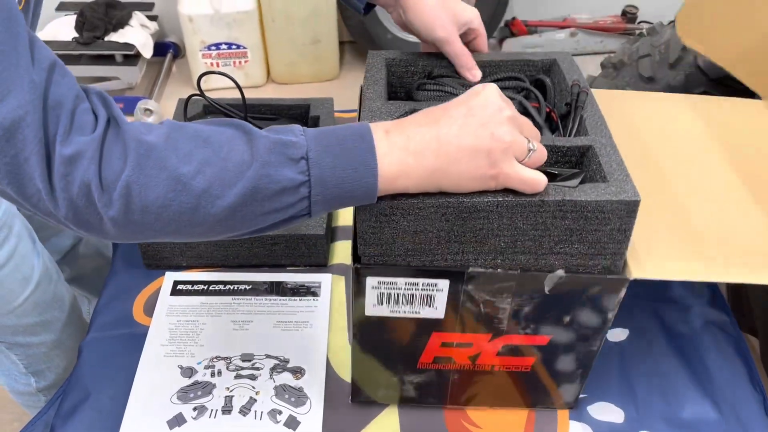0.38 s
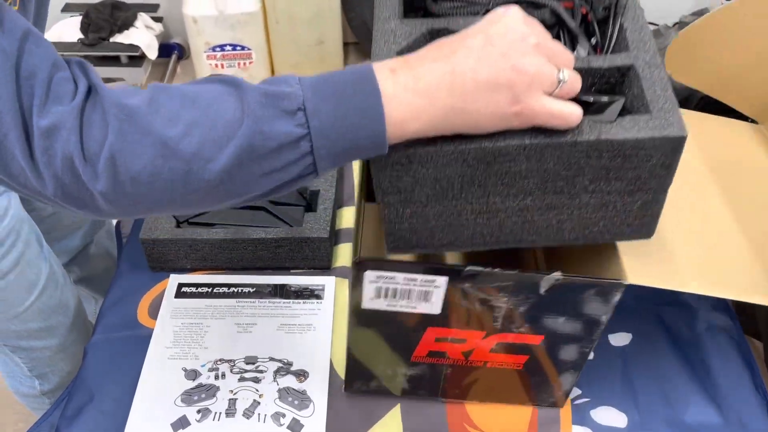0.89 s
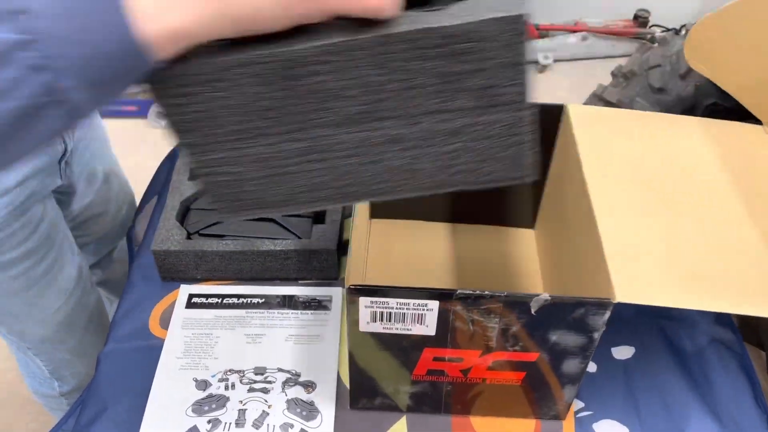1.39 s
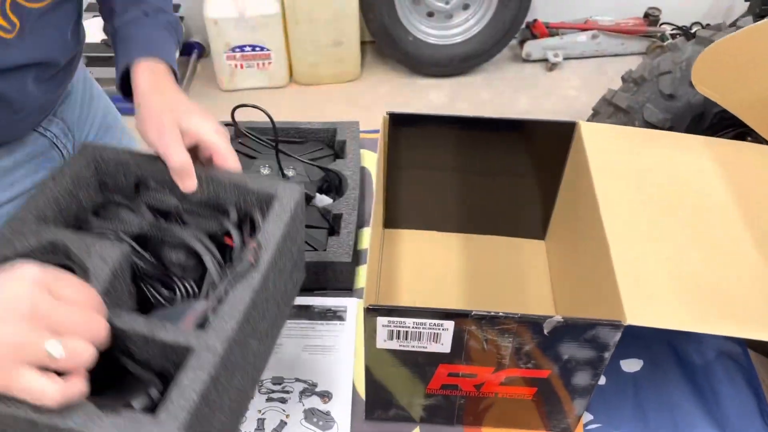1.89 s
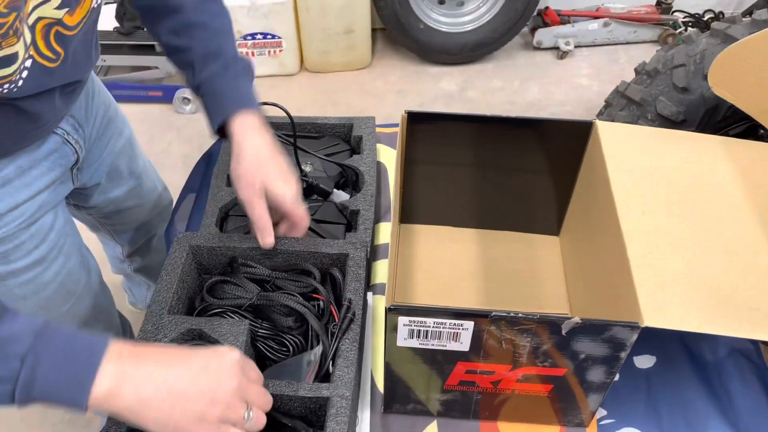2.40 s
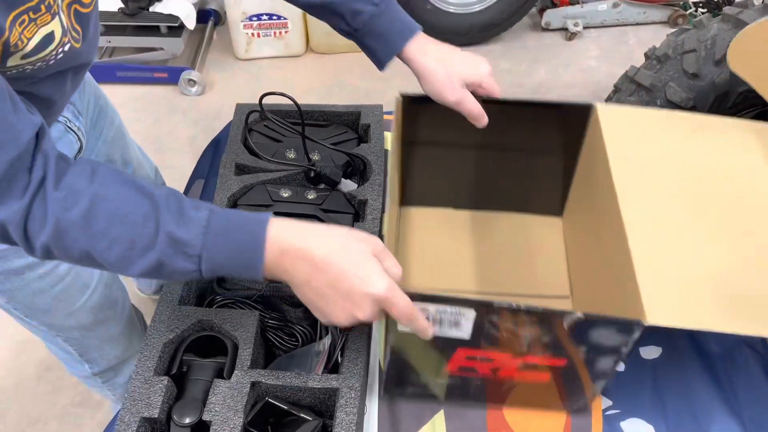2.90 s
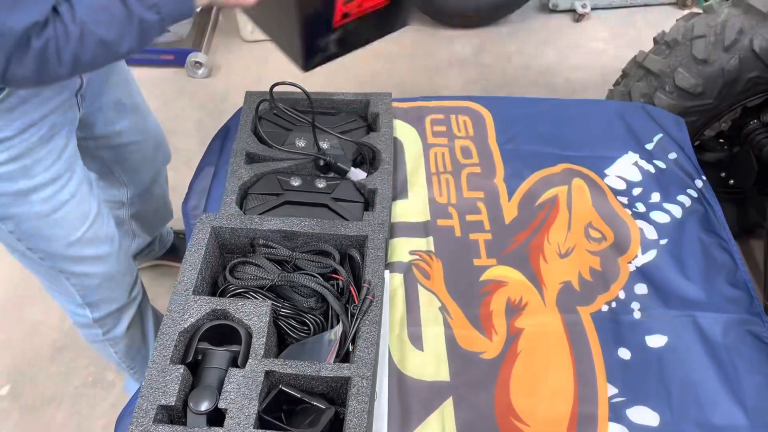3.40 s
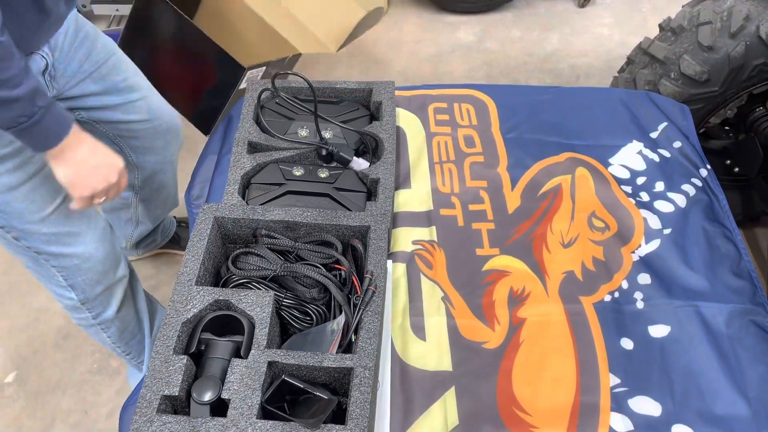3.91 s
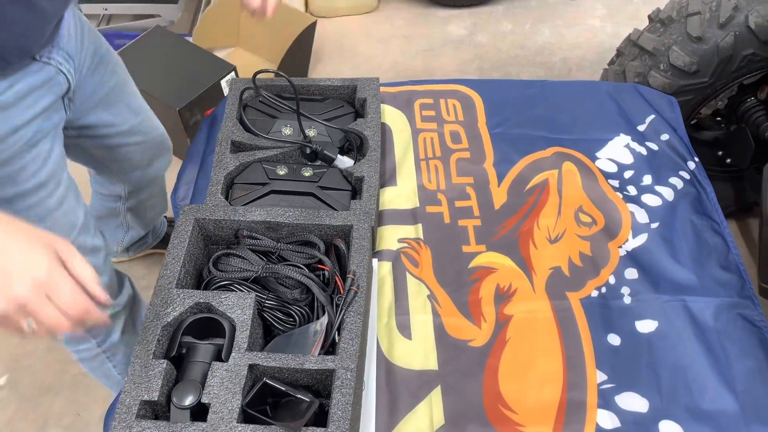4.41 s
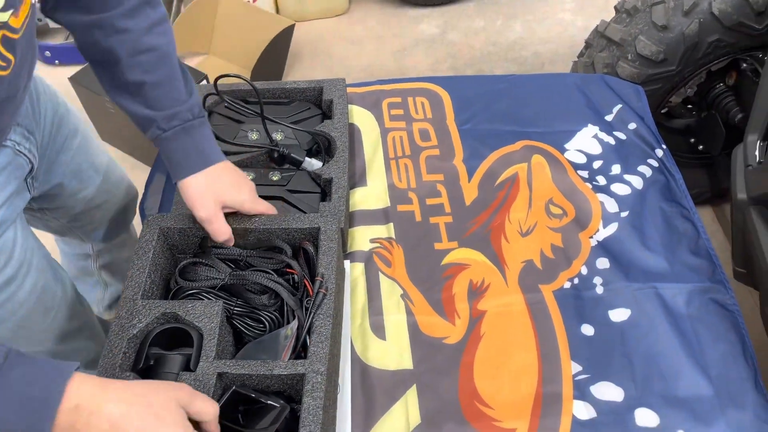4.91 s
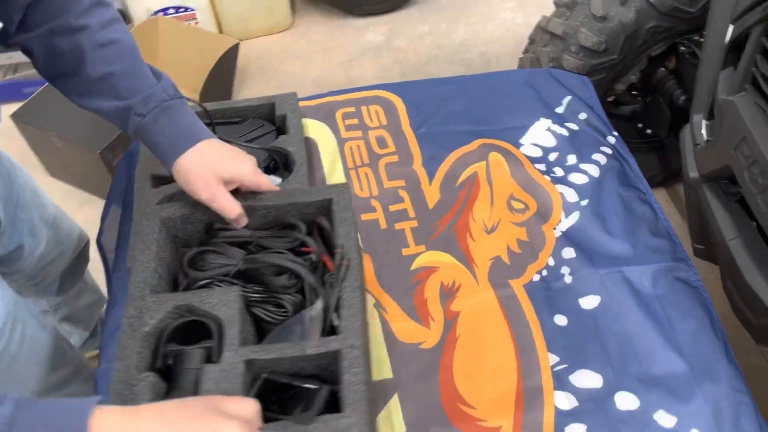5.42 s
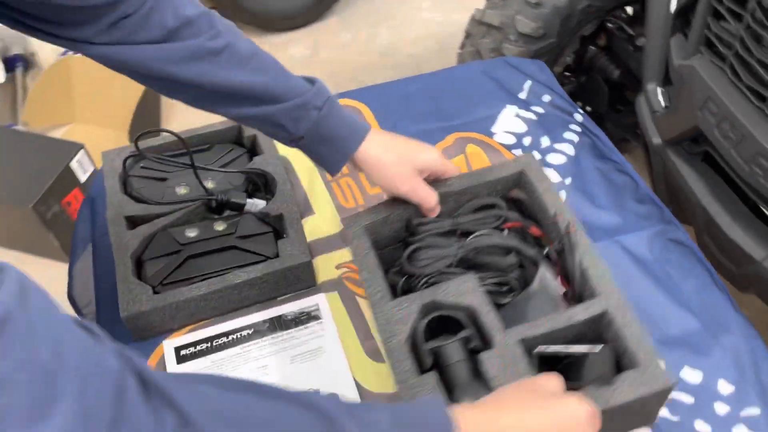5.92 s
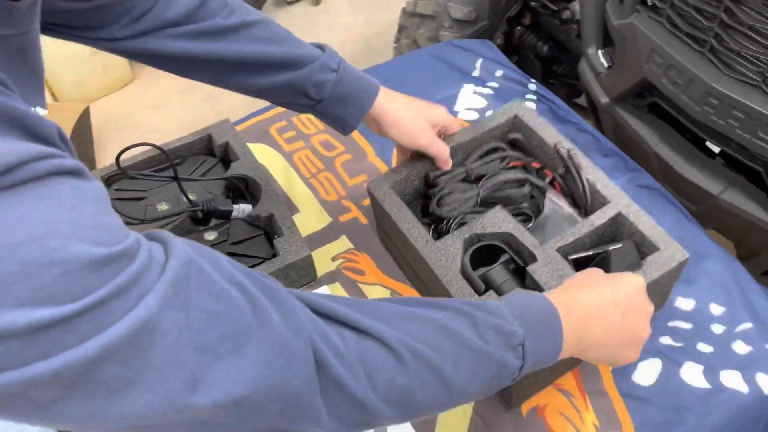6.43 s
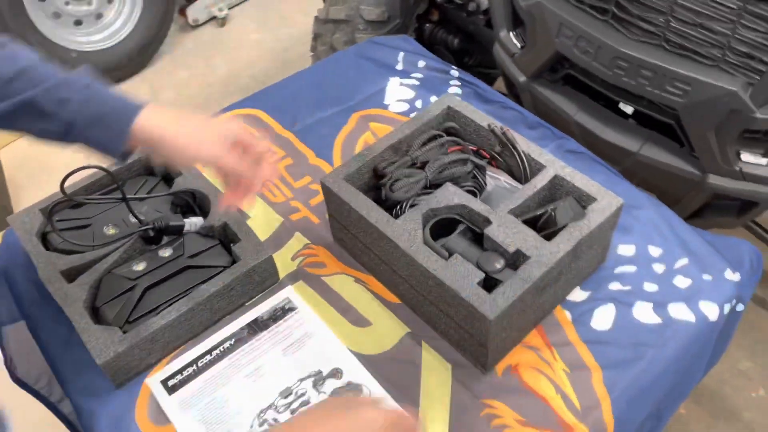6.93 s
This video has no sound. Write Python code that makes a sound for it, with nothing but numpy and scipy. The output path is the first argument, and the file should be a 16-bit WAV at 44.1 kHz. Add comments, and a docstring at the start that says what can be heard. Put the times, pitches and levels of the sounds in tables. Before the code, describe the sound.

Foam trays scrape and boom out of a cardboard box with knocks and ticks, then the empty box drops on concrete and skids in a garage.

```python
"""Foam rubs along card at once, close by, as trays with cable bundles leave a cardboard box in a hard garage.
Knocks, ticks and flaps follow; the empty box drops on the concrete and skids, then a tray slides over a table cloth.
Rubbing and sliding are random slips, filtered; blows are decaying modes and noise bursts.
Filtered noise makes the low distant hum and the room's echo; the microphone has two ports."""
import sys
import numpy as np
from scipy import signal
from scipy.fft import rfft, irfft
from scipy.io import wavfile
from scipy.ndimage import uniform_filter1d

SR = 44100
rng = np.random.default_rng(int(sys.argv[2]) if len(sys.argv) > 2 else 0)


def digitize_waveform(pressure):
    """Quantize a signal to 16-bit integers and store it at the path in sys.argv[1].

    Rows of a 2-D input are taken as channels; values are limited to [-1, 1].
    """
    field = np.atleast_2d(pressure).T
    bounded = np.clip(field, -1, 1)
    quanta = np.round(bounded * 32767).astype(np.int16)
    wavfile.write(sys.argv[1], SR, quanta)


def ratio(d):
    """dB to gain"""
    e = np.asarray(d, float) / 20
    return 10 ** e


N = 311326  # samples

# Distant machinery and air. Each row: frequency in Hz, relative level in dB per Hz.
HUM_SPECTRUM = [(20, -60), (40, -5.5), (80, 1.5), (130, -10), (260, -10.5), (500, -18), (1200, -25),
                (2200, -33.5), (3500, -41.5), (7000, -49.5), (13000, -40), (16000, -43.5)]
HUM_DB = -57.5
# Decay of the garage. Each row: frequency in Hz, time to fall 60 dB in s.
ROOM_DECAY = [(60, 0.33), (250, 0.94), (700, 1), (1500, 1), (4000, 0.71), (12000, 0.85)]
ROOM_DB = -9.5
# Width of diffuse sound at the ports. Each row: frequency in Hz, side minus mid in dB.
DIFFUSE_SIDE = [(60, -15.5), (200, -13.5), (400, -4), (800, -2.5), (5000, -2)]
# Phase of the right port's shared treble against the left. Each row: frequency in Hz, turn in radians.
PORT_TURN = [(6000, 0.69), (7600, 2.6), (8400, 2.7), (9300, 3.62), (10500, 4.27), (12500, 5.8), (16000, 19)]
SHARED_HZ = 6670  # above this both ports carry one signal
LOW_HZ, TOP_HZ = 45, 15350  # limits of the microphone

# Bands of scraped card. Each row: centre in Hz, width in Hz, relative level in dB.
SCRAPE_BANDS = [(655, 940, 2), (1021, 360, -9.5), (1330, 50, 1.5), (1870, 154, -5.5)]
# Crackle of foam and card. Each row: frequency in Hz, relative level in dB per Hz.
CRACKLE_SPECTRUM = [(1200, -3), (2200, 0), (3200, 0), (5000, -3), (7000, -9.5), (10000, -19)]
# Finest, brightest friction. Each row: frequency in Hz, relative level in dB per Hz.
FIZZ_SPECTRUM = [(4000, -64), (7000, 3.5), (10000, 3.5), (13500, -2), (16000, -1.5)]
# Panels and air of the box. Each row: nominal frequency in Hz, relative level in dB, nominal 60 dB decay in s.
BOX_MODES = [(56, -14, .15), (103, -7, .16), (138, -2, .25), (233, -5, .09), (265, -5, .09), (323, -6, .11),
             (352, -8, .18), (468, -7, .07), (550, -7, .07), (587, -5, .075), (609, -6, .075),
             (775, -2, .055), (950, -5, .04), (1500, -11, .035)]

# Thin squeaks on the cloth, lower as they catch and let go.
# Each row: start in seconds, length in s, top pitch in Hz, sag in Hz, level in dB.
CLOTH_SQUEAKS = [(5.695, .24, 5390, 950, -82), (6.085, .09, 4790, 350, -82)]
CATCH_S, LET_GO_S = .05, .075
# the tray's hollow rasp on the cloth
SLIDE_S, SLIDE_HOLD_S, SLIDE_SWELL_S, SLIDE_DB = 5.63, .46, .05, -78.5
SLIDE_HZ, SLIDE_WIDTH_HZ = 2010., 130.
# the fallen box on the concrete
SKID_S, SKID_SWELL_S, SKID_DB, SKID_FADE_DB_S = 4.72, 0.11, -51.5, 67
SKID_FROM_HZ, SKID_TO_HZ, SKID_WIDTH_HZ = 950., 1234, 360

# Small plastic parts tapping together; the row at 3.969 s is a brief high ring in the flap's swish. Each row:
# time in seconds, nominal pitch in Hz, level in dB.
PLASTIC_PIPS = [(1.56, 2170, -47), (2.392, 1860, -31), (3.969, 4560, -35), (5.167, 1174, -36.5),
                (5.469, 1750, -49), (6.755, 1050, -42), (6.853, 2020, -48.5), (7.005, 1030, -45)]
# Partials of a pip. Each row: ratio to its pitch, relative level in dB.
PIP_RATIOS = [(.78, -2.5), (1, 3.5), (1.2, -6.5)]
PIP_T60_S = .014
# Dry ticks of cable ties and foam cells. Each row: time in seconds, level in dB.
DRY_TICKS = [(0.941, -56), (0.9718, -50.5), (1.229, -60.5), (1.258, -55.5), (1.276, -51.5), (1.2989, -50),
             (1.616, -55), (2.842, -44.5), (2.9365, -58.5), (2.957, -63), (3.152, -43), (3.169, -49.5),
             (3.97, -46.5)]
# Knocks of trays, cables and hands.
# Each row: time in seconds, blow in dB, thud pitch in Hz, thud in dB above the blow, crack in dB above the blow.
TRAY_KNOCKS = [(0.145, -23.5, 303, -20, -29), (0.18, -42, 172, 15.5, -29), (0.666, -43.5, 296, 18, -21),
               (0.704, -41.5, 341, 6, 3.5), (0.929, -49, 232, -21, -7), (1.093, -34.5, 175, -1, -52),
               (1.131, -39.5, 233, 3.5, -42), (1.18, -42.5, 175, 3.5, -51), (1.219, -38, 178, 2.5, -42),
               (2.195, -32.5, 397, -12, -13), (2.503, -48, 280, -26, -12), (2.765, -32, 173, 12, -9.5),
               (2.857, -41, 115, 7.5, -12.5), (3.045, -49, 233, -22.5, -14), (3.151, -49.5, 103, 1.5, -3),
               (3.603, -46.5, 380, -5.5, -15.5), (4.67, -51, 326, 7, -18), (4.692, -51.5, 320, 11, -28),
               (4.728, -56, 422, 17.5, -30), (5.47, -55.5, 700, -6, -36), (6.441, -51, 71.6, 14, -27),
               (6.471, -38.5, 95, 5, -23), (6.488, -46, 130.4, 7, -28.5), (6.612, -47, 169, -3, -5.5)]

# Card flaps whipping past cloth.
# Each row: start in seconds, crackle in dB, fade in dB per s, fizz and scrape in dB above the crackle.
FLAP_SWISHES = [(3.232, -45, 111, -7, -12), (3.962, -57.5, 139, 7.5, -9)]
SWISH_RISE_S, SWISH_HOLD_S, FIZZ_FADES_FASTER = 0.008, 0.03, 4.3
WHOOSH_FROM_HZ, WHOOSH_TO_HZ, WHOOSH_WIDTH_HZ = 3300., 2100., 900.
WHOOSH_FALL_S, WHOOSH_DB = .04, -9  # level against the crackle
# Foam jammed along the card walls, dull and boomy.
# Each row: start in seconds, hold in s, scrape in dB, boom in dB above the scrape.
FOAM_PULLS = [(0, 0.0065, -44.5, 8), (0.05, 0.14, -62, 7), (0.151, 0.069, -43, 6.5), (0.247, 0.093, -50, 6),
              (0.653, 0.025, -57, 18), (0.75, 0.029, -53, 10), (1.097, 0.16, -70, 20.5),
              (2.764, 0.011, -49, 12.5), (6.46, 0.019, -45.5, 2)]
PULL_RISE_S, PULL_FADE_DB_S, PULL_CRACKLE_DB, PULL_FIZZ_DB = 0.0014, 207, -11.5, -19
# Hands, foam and cables brushing card or cloth.
# Each row: start in seconds, swell in s, scrape in dB, fade in dB per s, extra treble in dB.
BRUSHING_RUBS = [(.03, 0.059, -57, 60, 9.5), (0.151, 0.0082, -46, 210, 7), (.33, 0.078, -55.5, 39, 4.5),
                 (.44, 0.065, -47, 305, 2.5), (.52, 0.024, -46, 198, 3.5), (.6, 0.038, -53.5, 86, 10.5),
                 (0.694, 0.011, -50.5, 403, 13), (1.55, 0.1, -66, 95.5, 4), (2.08, 0.049, -60.5, 104, -0.5),
                 (2.176, 0.015, -51.5, 200, 0.5), (2.21, 0.02, -55, 150, -2), (2.327, 0.021, -52, 83, 8),
                 (2.375, 0.024, -52, 204, 8), (2.685, .008, -63, 53.5, 1), (2.78, 0.014, -64, 202, 13.5),
                 (3.09, 0.029, -54.5, 199, 0), (4.662, 0.0075, -47, 49.5, 8), (4.761, 0.093, -51.5, 58, 4),
                 (5.07, 0.085, -59.5, 160, 7), (5.551, 0.1, -77.5, 11, 10.5), (6.02, 0.028, -67, 204, 12),
                 (6.38, 0.041, -59, 68, -1.5), (6.42, 0.036, -43, 300, 5.5), (6.53, 0.071, -58, 217, 10.5),
                 (6.92, 0.066, -60, 85, 0)]
RUB_CRACKLE_DB, RUB_FIZZ_DB, RUB_BOOM_DB = -9.5, -9, -7  # above the scrape; treble is added to the first two
# The empty box lands on corner, edge and face, then bounces.
# Each row: time in seconds, blow in dB, slap in dB above the blow, brightness in dB per octave.
BOX_LANDINGS = [(4.127, -8.5, -27, 2.5), (4.141, -13.5, -45, -0.5), (4.165, -7, -30.5, 0.5),
                (4.181, -6.5, -50, -0.5), (4.195, -18.5, -36, 0), (4.225, -12, -50.5, -0.5),
                (4.26, -15, -49, -1.5), (4.305, -18, -44, -1), (4.344, -19.5, -23.5, 1)]


def unit(x):
    """Scaled to rms 1."""
    return x / np.sqrt(np.mean(x ** 2))


def read(table, hz):
    """A (Hz, value) table joined by straight lines on a log frequency axis."""
    f, v = np.transpose(table)
    return np.interp(np.log(np.maximum(hz, 1)), np.log(f), v)


def colour(x, gain):
    """Filter by a gain given as a function of frequency."""
    hz = np.arange(x.shape[-1] // 2 + 1) * SR / x.shape[-1]
    return irfft(rfft(x) * gain(hz), x.shape[-1])


def shaped(x, table):
    """Coloured by a (Hz, dB) table, rms 1."""
    return unit(colour(x, lambda hz: ratio(read(table, hz))))


def band(x, lo_hz, hi_hz):
    """Causal band-pass."""
    return signal.sosfilt(signal.butter(2, [lo_hz, min(hi_hz, .45 * SR)], "band", fs=SR, output="sos"), x)


def ring(hz, t60, s):
    """One decaying mode."""
    return np.sin(2 * np.pi * hz * s) * np.exp(-np.log(1000) * s / t60)


def add(out, t, sound):
    """Mix a sound in at time t."""
    i = int(t * SR)
    out[i:i + len(sound)] += sound[:N - i]


def walk(rate):
    """Random levels, one every 1 / rate s, smoothed twice; spread near 1."""
    k = int(SR / rate)
    steps = np.repeat(rng.standard_normal(N // k + 1), k)
    return 1.73 * uniform_filter1d(uniform_filter1d(steps, k), k)[:N]


def slips(rate, spread_db):
    """Tiny slips of foam cells, rate per second on average, a few much larger than the rest."""
    chance = rng.random((3, N))
    happens = chance[0] < rate / SR
    size = ratio(-spread_db * np.log(1 - chance[2]))
    return unit(happens * np.sign(chance[1] - .5) * size)


def stroke(start, swell, hold, db, fade_db_s):
    """Power of one movement: it swells, holds, then fades at a steady rate."""
    s = np.arange(N) / SR - start
    rise = np.clip(s / max(swell, 1 / SR), 0, 1)
    return (rise * ratio(db - fade_db_s * np.maximum(s - swell - hold, 0))) ** 2


def rasp(x, hz, width_hz):
    """Slips heard through one band whose centre may move from sample to sample; rms 1."""
    slow = signal.sosfilt(signal.butter(2, width_hz / 2, fs=SR, output="sos"), x)
    return unit(slow * np.sin(2 * np.pi * np.cumsum(hz) / SR))


def snap(noise, fizz=0.7):
    """The bright colour of a breaking contact."""
    return shaped(noise, CRACKLE_SPECTRUM) + fizz * shaped(noise, FIZZ_SPECTRUM)


def wide(mid, side):
    """Diffuse sound: alike at both ports in the bass, less related higher up."""
    side = colour(side, lambda hz: ratio(read(DIFFUSE_SIDE, hz)))
    return np.array([mid + side, mid - side])


def hum():
    """Distant machinery and air: coloured noise, wavering a little."""
    mid, side = colour(rng.standard_normal((2, N)), lambda hz: ratio(read(HUM_SPECTRUM, hz)))
    return ratio(HUM_DB + 0.38 * walk(3.84)) * wide(mid, side) / np.std(mid)


def garage(x):
    """Reflections build up over some ms and die away band by band."""
    s, tail = np.arange(int(1.2 * SR)) / SR, 0
    for hz in 40 * 2. ** np.arange(0, 8.7, 1 / 3):  # third octaves
        t60 = read(ROOM_DECAY, hz)
        noise = band(rng.standard_normal((2, len(s))), hz / 2 ** (1 / 6), hz * 2 ** (1 / 6))
        tail = tail + noise * np.exp(-np.log(1000) * s / t60) / np.sqrt(t60)
    tail = tail * (1 - np.exp(-s / 0.013))
    tail = wide(*tail) / np.sqrt(np.sum(tail[0] ** 2))
    return ratio(ROOM_DB) * signal.fftconvolve(x[None], tail, axes=1)[:, :N]


def table_top(x):
    """Near sounds arrive slightly from the left; table and trays scatter them differently to each port."""
    s = np.arange(SR // 20) / SR
    scatter = rfft(rng.standard_normal(len(s)) * np.exp(-s / 0.011), N)
    side = irfft(rfft(x) * scatter / np.abs(scatter), N)  # phase only
    return wide(x, side) * ratio([[.6], [-.6]])


def sliding():
    """Foam dragged over cloth: a narrow rasp and a wavering stick-slip tone."""
    t = np.arange(N) / SR
    hollow = rasp(slips(900., 1.5), SLIDE_HZ * (1 + .014 * walk(14)), SLIDE_WIDTH_HZ)
    drag = np.sqrt(stroke(SLIDE_S, SLIDE_SWELL_S, SLIDE_HOLD_S, SLIDE_DB, 200.))
    out = drag * ratio(1.8 * walk(20)) * hollow
    for start, length, top_hz, sag_hz, db in CLOTH_SQUEAKS:
        since, left = t - start, start + length - t
        edge = np.clip(np.minimum(since, left), 0, 1)
        slack = np.maximum(1 - since / CATCH_S, 1 - left / LET_GO_S)
        hz = top_hz - sag_hz * np.clip(slack, 0, 1) ** 2
        tone = np.sin(2 * np.pi * np.cumsum(hz * (1 + 0.002 * walk(110))) / SR)
        out = out + np.minimum(edge / 0.017, 1) * ratio(db + 2.0 * walk(60)) * np.sqrt(2) * tone
    return out


def skid():
    """Card drags over concrete in uneven slips; the band it rasps in climbs with the push."""
    push = np.clip((np.arange(N) / SR - SKID_S) / SKID_SWELL_S, 0, 1)
    hz = (SKID_FROM_HZ + (SKID_TO_HZ - SKID_FROM_HZ) * push) * (1 + .05 * walk(25))
    drag = np.sqrt(stroke(SKID_S, SKID_SWELL_S, 0, SKID_DB, SKID_FADE_DB_S))
    return drag * rasp(slips(1200., 2.4), hz, SKID_WIDTH_HZ)


def plastic_pips():
    """Small plastic parts tap together, and one flap rings briefly: a few short partials, roughened by noise."""
    out, s = np.zeros(N), np.arange(SR // 5) / SR
    for t, hz, db in PLASTIC_PIPS:
        tone = sum(ratio(g) * ring(r * hz, PIP_T60_S, s) for r, g in PIP_RATIOS)
        rough = 1 + 0.26 * rng.standard_normal(len(s))
        add(out, t, ratio(db) * tone * (1 - np.exp(-s / 0.002)) * rough)
    return out


def ticks():
    """Cable ties and foam cells tick dryly: all crack, gone within some ms."""
    out, s = np.zeros(N), np.arange(SR // 5) / SR
    for t, db in DRY_TICKS:
        add(out, t, ratio(db) * snap(rng.standard_normal(len(s)), 1.95) * np.exp(-s / 0.0012))
    return out


def knocks():
    """Each knock: a dull tap, a short low thud of the struck tray and a crack of noise."""
    out, s = np.zeros(N), np.arange(SR // 5) / SR
    for t, db, hz, thud_db, crack_db in TRAY_KNOCKS:
        noise = rng.standard_normal((2, len(s)))
        tap = band(noise[0] * np.exp(-s / 0.012), 600.0, 1480.0) * 2.0 + ring(620., 0.0085, s)
        thud = 2.05 * ring(hz, 0.052, s) * (1 - np.exp(-(s / 0.0037) ** 2))  # soft foam pushes slowly
        crack = snap(noise[1]) * np.exp(-s / 0.0093)
        add(out, t, ratio(db) * (tap + ratio(thud_db) * thud + ratio(crack_db) * crack))
    return out


def swishes(scrape, crackle, fizz, air):
    """A flap whips past without grip: a quick front, a smooth fade, a band that sinks as it slows."""
    out, t = 0, np.arange(N) / SR
    for start, db, fade, fizz_db, scrape_db in FLAP_SWISHES:
        fall = np.exp(-np.maximum(t - start, 0) / WHOOSH_FALL_S)
        hz = WHOOSH_TO_HZ + (WHOOSH_FROM_HZ - WHOOSH_TO_HZ) * fall
        whoosh = ratio(WHOOSH_DB) * rasp(air, hz, WHOOSH_WIDTH_HZ)
        body = crackle + ratio(scrape_db) * scrape + whoosh
        out = out + np.sqrt(stroke(start, SWISH_RISE_S, SWISH_HOLD_S, db, fade)) * body
        fizz_power = stroke(start, SWISH_RISE_S, SWISH_HOLD_S, db + fizz_db, FIZZ_FADES_FASTER * fade)
        out = out + np.sqrt(fizz_power) * fizz
    return out


def pressure():
    """How hard the movements drive scrape, crackle, fizz and boom at each moment."""
    mix_db = [[0, PULL_CRACKLE_DB, PULL_FIZZ_DB, boom_db] for *_, boom_db in FOAM_PULLS]
    mix_db += [[0, RUB_CRACKLE_DB + treble_db, RUB_FIZZ_DB + treble_db, RUB_BOOM_DB]
               for *_, treble_db in BRUSHING_RUBS]
    moves = [stroke(t, PULL_RISE_S, hold, db, PULL_FADE_DB_S) for t, hold, db, _ in FOAM_PULLS]
    moves += [stroke(t, swell, 0, db, fade) for t, swell, db, fade, _ in BRUSHING_RUBS]
    return np.sqrt(ratio(mix_db).T ** 2 @ np.array(moves))  # powers add


def rubbing():
    """Slips ring the card walls, crackle in the foam and shake the hollow box; the grip is never even."""
    coarse, fine, shake = slips(1800., 2.2), slips(5000., 2.3), slips(900., 1.5)
    finest = fine + .8 * slips(1500., 3.3)
    scrape = band(coarse, 464.0, 1600.0)
    scrape = scrape + sum(ratio(db) * band(coarse, f - w / 2, f + w / 2) for f, w, db in SCRAPE_BANDS)
    s = np.arange(SR // 4) / SR
    panels = sum(ratio(g) * ring(f, .5 * t60, s) for f, g, t60 in BOX_MODES[1:7])  # damped by the foam's hold
    boom = unit(band(shake, 53.0, 347.0)) + 0.088 * unit(signal.fftconvolve(shake, panels)[:N])
    crackle, fizz = shaped(fine, CRACKLE_SPECTRUM), shaped(finest, FIZZ_SPECTRUM)
    layers = np.array([unit(scrape), crackle, fizz, unit(boom)])
    grip = ratio(2.3 * walk(45))
    return grip * np.sum(pressure() * layers, axis=0) + swishes(*layers[:3], fine)


def box_drop():
    """Each contact with the floor shakes the box modes anew, with a papery thump and a slap."""
    out, s = np.zeros(N), np.arange(SR // 2) / SR
    for t, db, slap_db, tilt_db in BOX_LANDINGS:
        share, noise = rng.standard_normal(len(BOX_MODES)), rng.standard_normal((2, len(s)))
        modes = 0
        for c, (f, g, t60) in zip(share, BOX_MODES):  # c varies sign, level and pitch
            level_db = g + 2.0 * c + tilt_db * np.log2(f / BOX_MODES[6][0])
            modes = modes + np.sign(c) * ratio(level_db) * ring(f * (1 + 0.0098 * c), t60, s)
        thump = band(noise[0], 184.0, 810.0) * np.exp(-s / 0.039) * 2.31
        thump = thump + band(noise[1], 900.0, 2600.) * np.exp(-s / 0.015) * 0.22
        slap = snap(noise[1]) * np.exp(-s / 0.069)
        onset = 1 - np.exp(-s / 0.0054)
        add(out, t, ratio(db) * onset * (0.8 * modes + thump + ratio(slap_db) * slap))
    return out


def scene():
    """Near sounds, their echo and the hum; the faint tray slide is too weak to fill the room."""
    near = rubbing() + knocks() + ticks() + plastic_pips() + box_drop() + skid()
    return table_top(near + sliding()) + garage(near) + hum()


def roll_off(x):
    """The treble ends steeply here."""
    return signal.sosfilt(signal.butter(12, 16500, fs=SR, output="sos"), x)


def record(dry):
    """The microphone cuts both ends; its ports share their treble, out of phase near 9 kHz; peaks are rounded."""
    hz = np.maximum(np.arange(N // 2 + 1) * SR / N, 1)
    shared = 1 / (1 + (SHARED_HZ / hz) ** 16)
    ports = rfft(dry) / np.sqrt((1 + (LOW_HZ / hz) ** 4) * (1 + (hz / TOP_HZ) ** 80))
    treble = ports.mean(axis=0) * np.exp(1j * read(PORT_TURN, hz) * np.array([[0], [1]]))
    mix = np.tanh(irfft((1 - shared) * ports + shared * treble, N))
    return roll_off(mix)


dry = scene()
out = record(dry)
digitize_waveform(out)
```